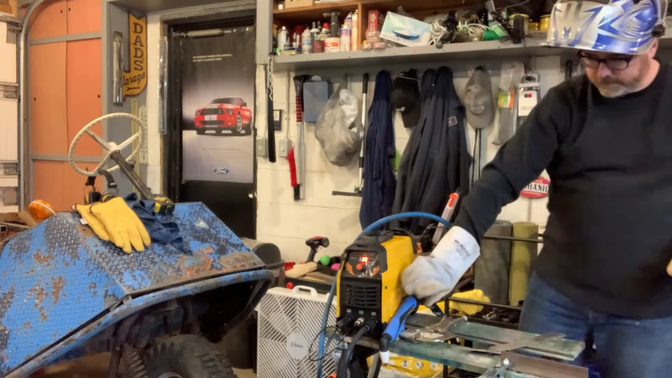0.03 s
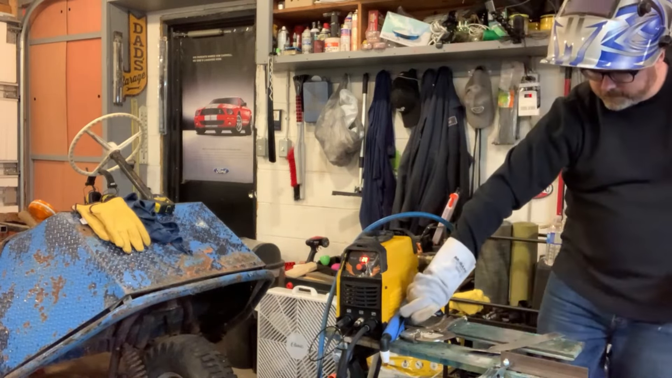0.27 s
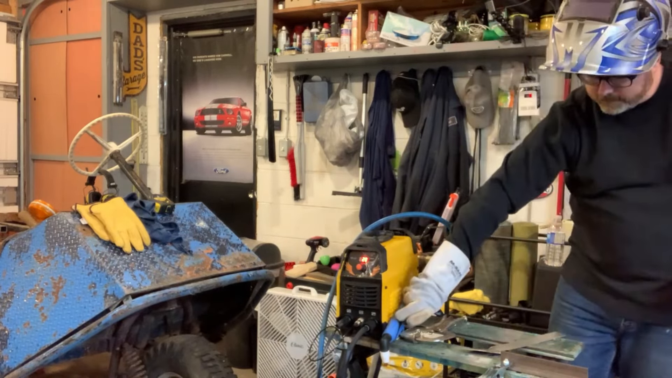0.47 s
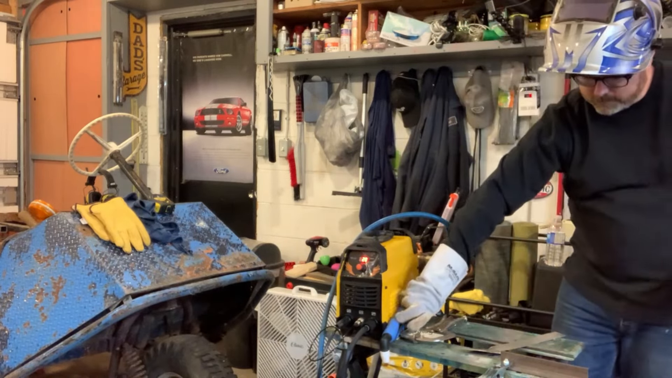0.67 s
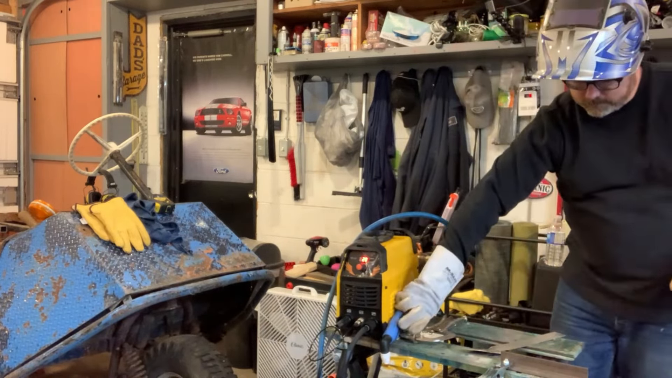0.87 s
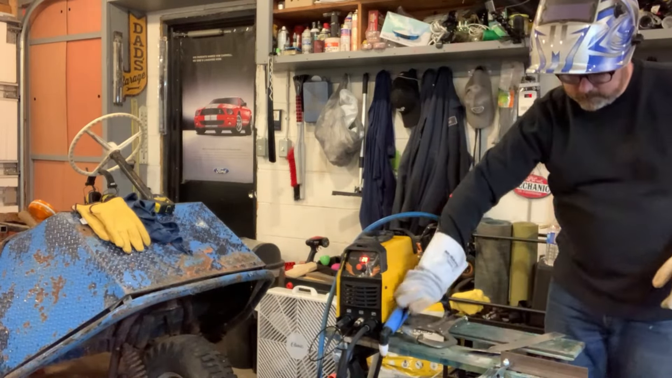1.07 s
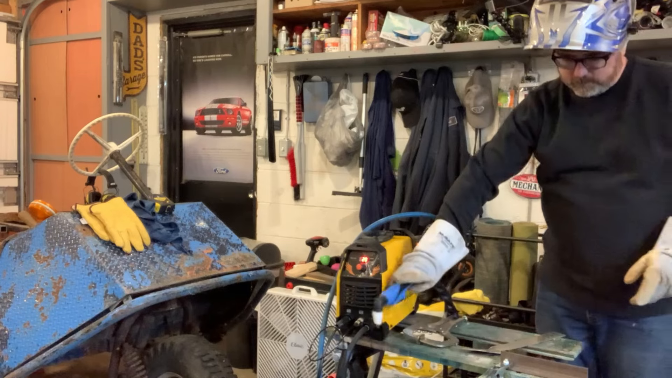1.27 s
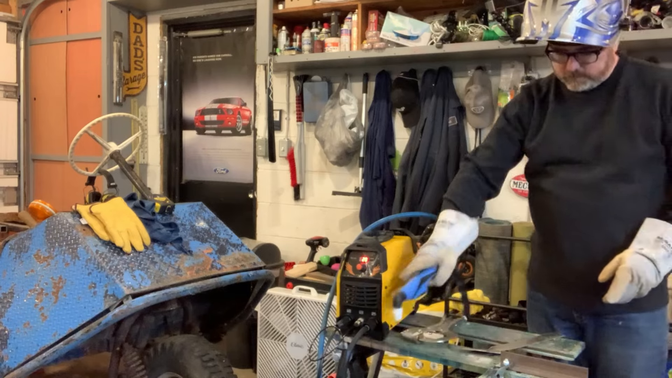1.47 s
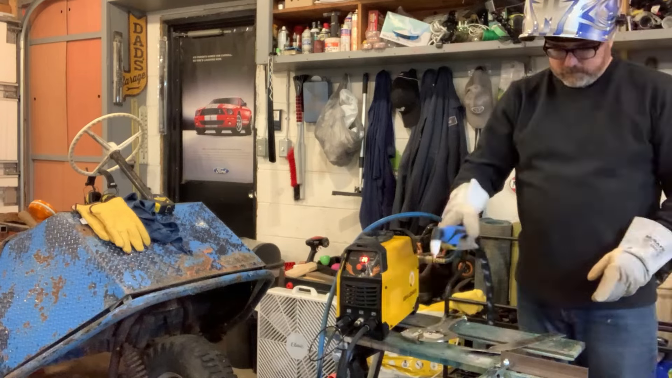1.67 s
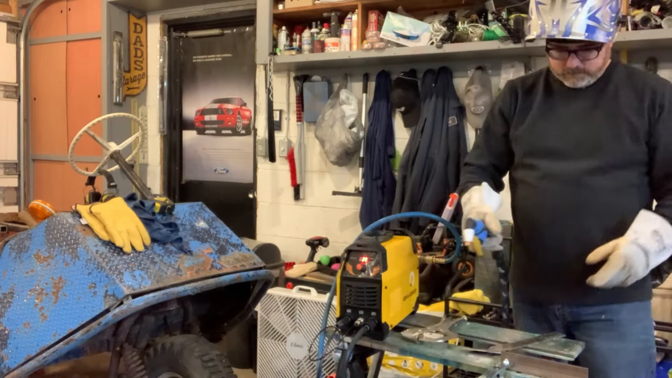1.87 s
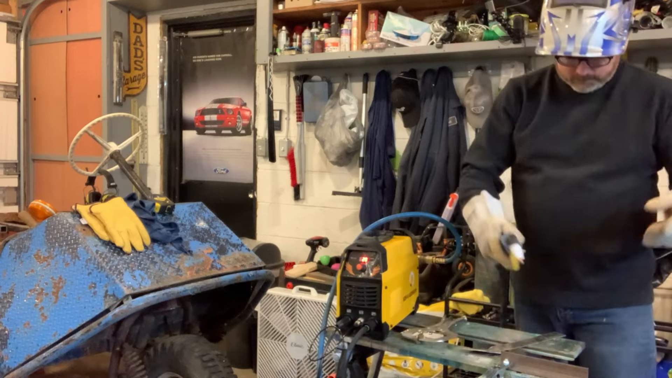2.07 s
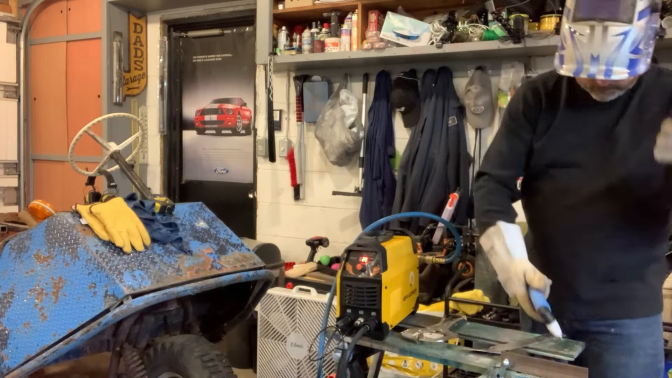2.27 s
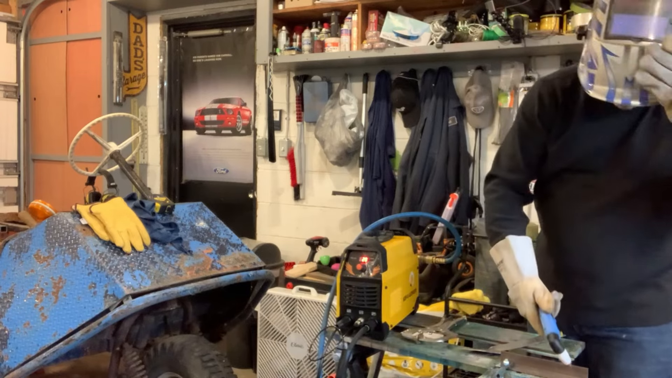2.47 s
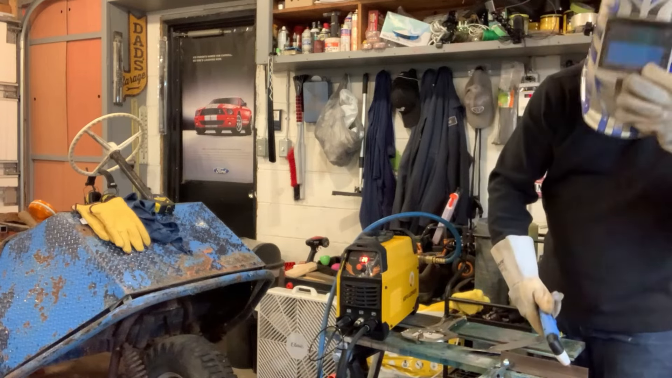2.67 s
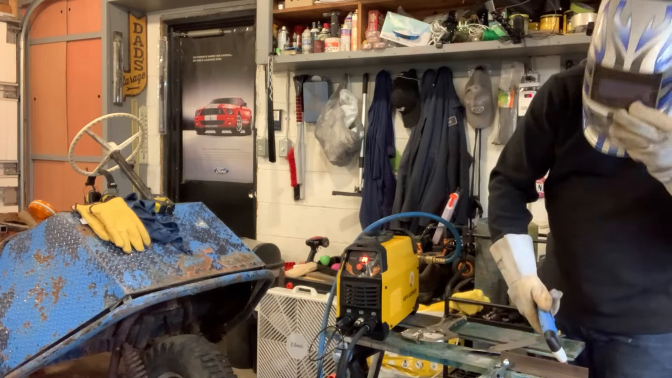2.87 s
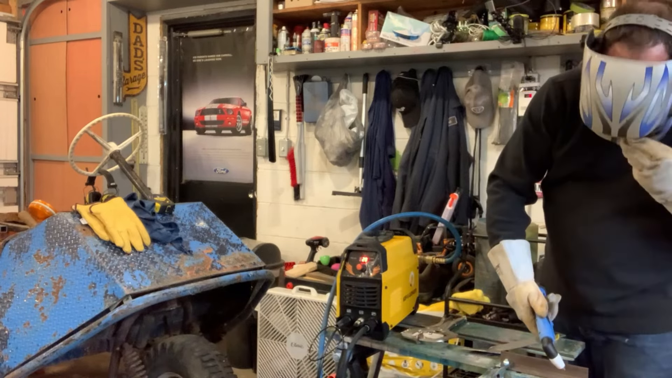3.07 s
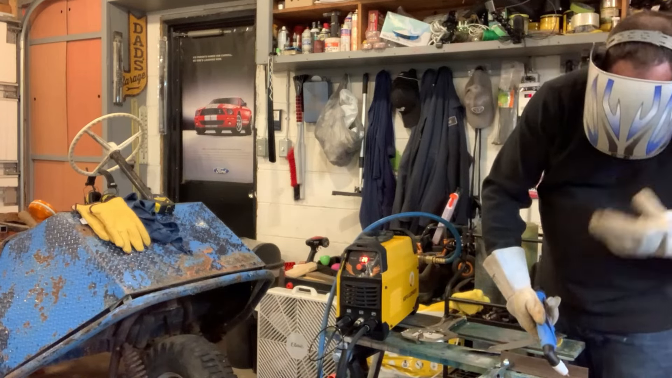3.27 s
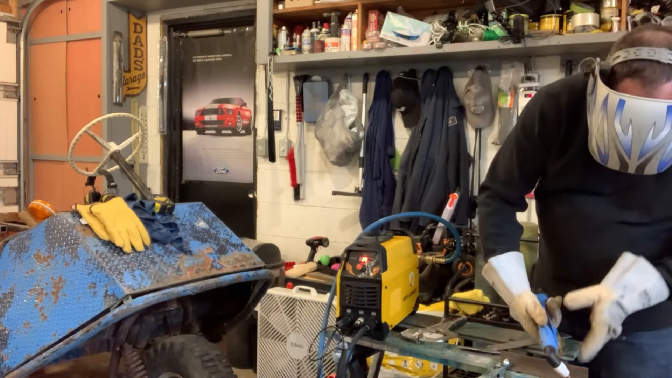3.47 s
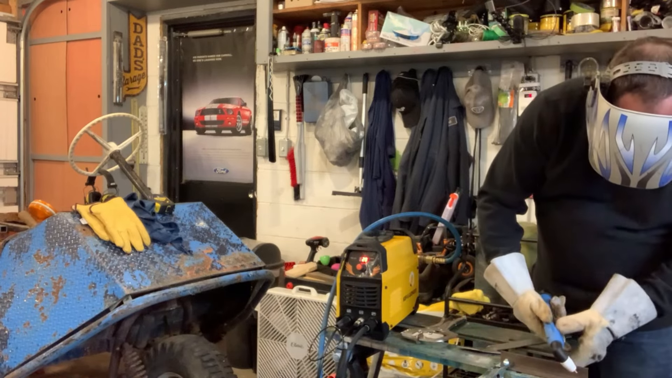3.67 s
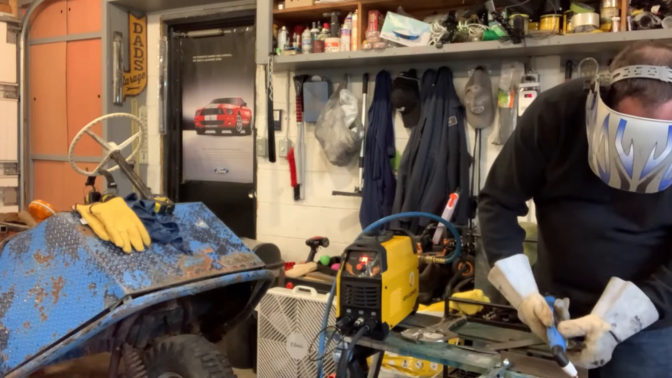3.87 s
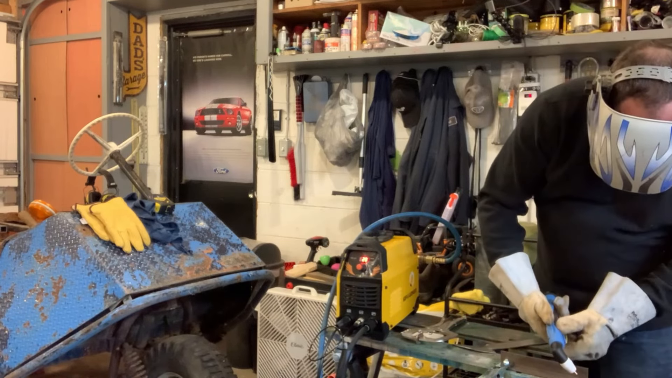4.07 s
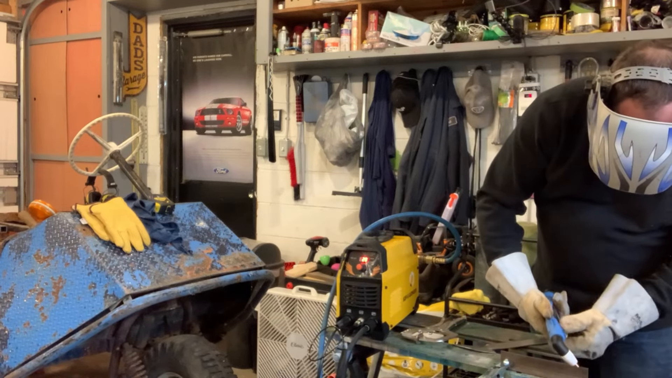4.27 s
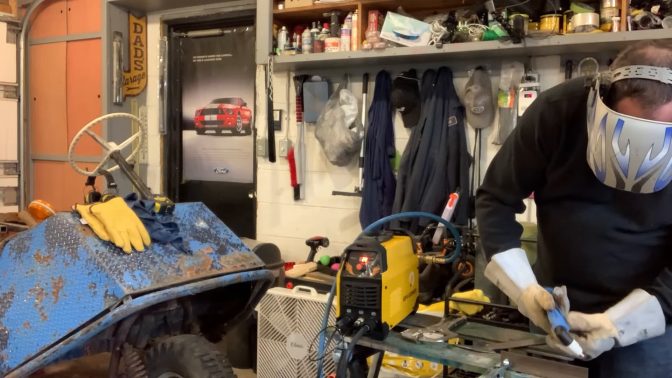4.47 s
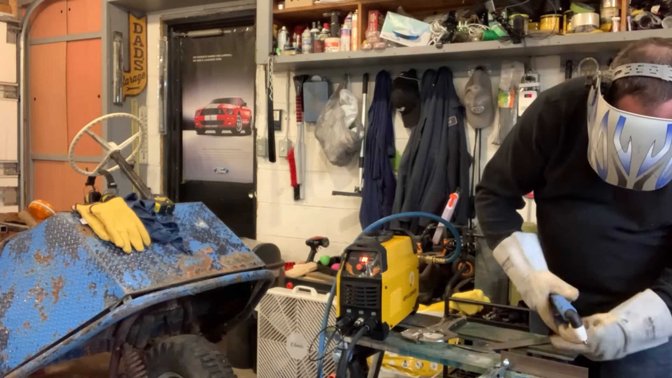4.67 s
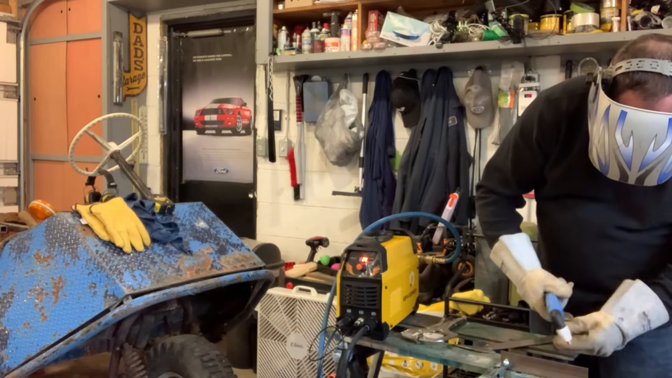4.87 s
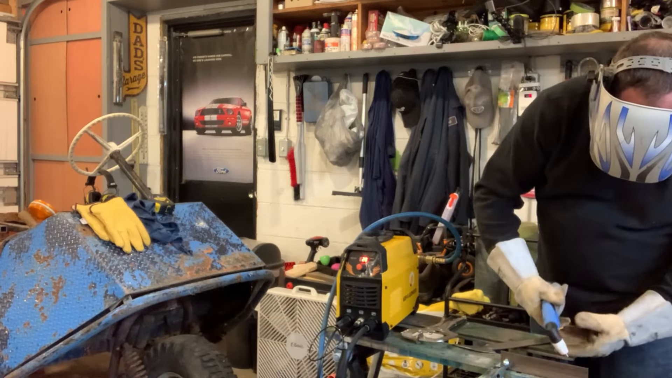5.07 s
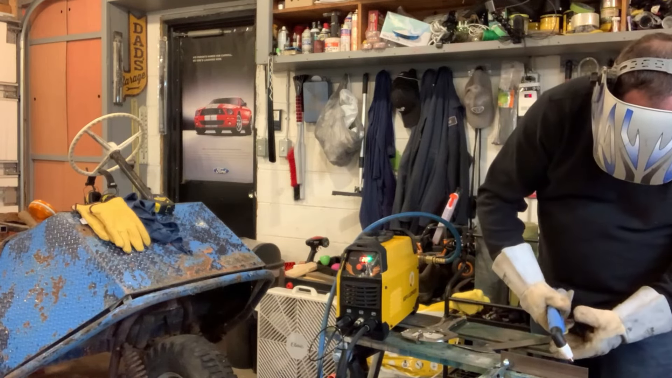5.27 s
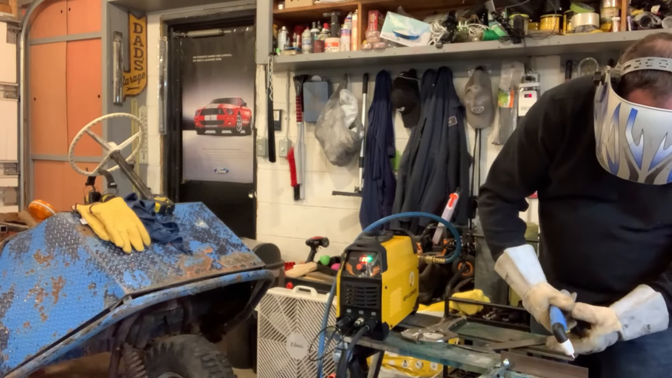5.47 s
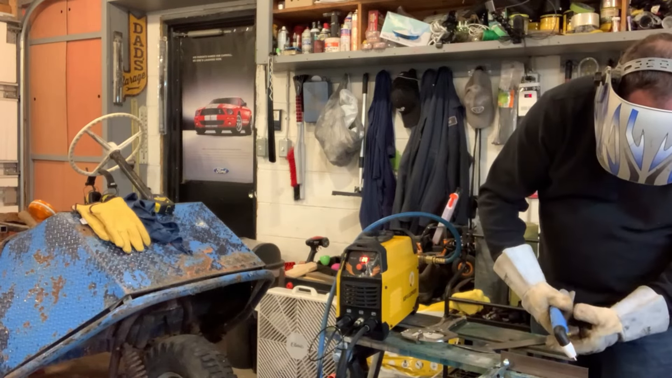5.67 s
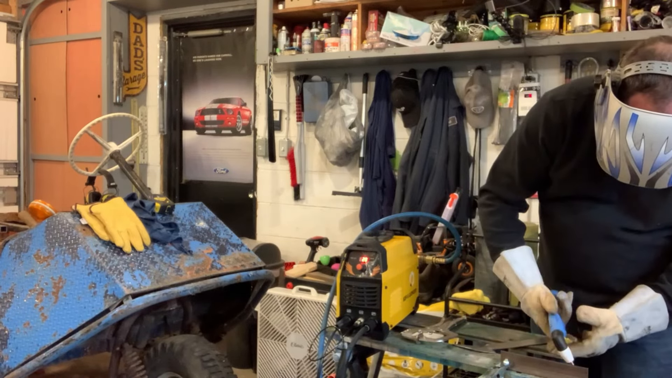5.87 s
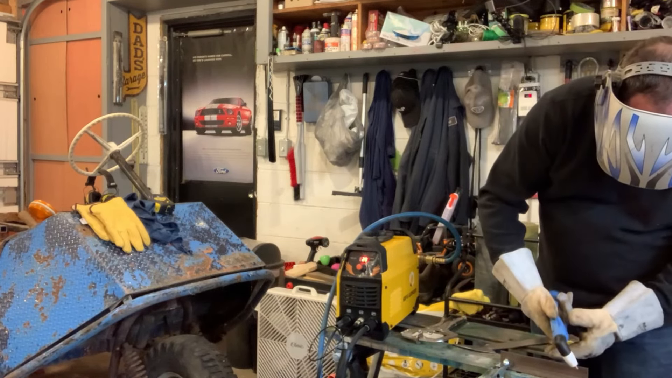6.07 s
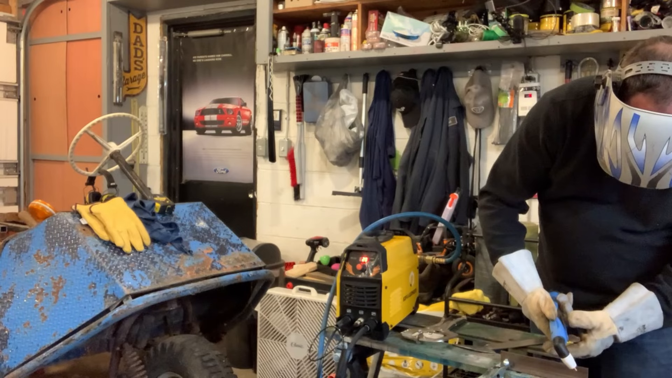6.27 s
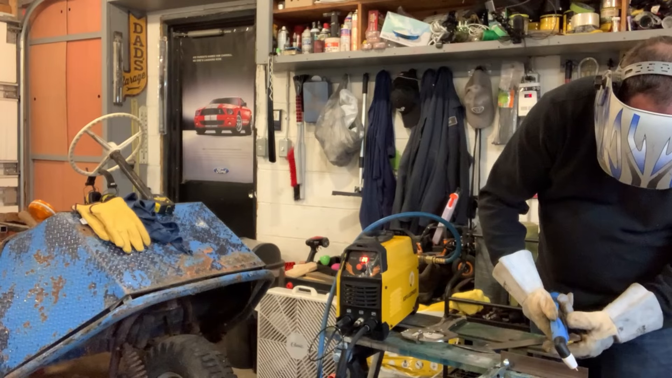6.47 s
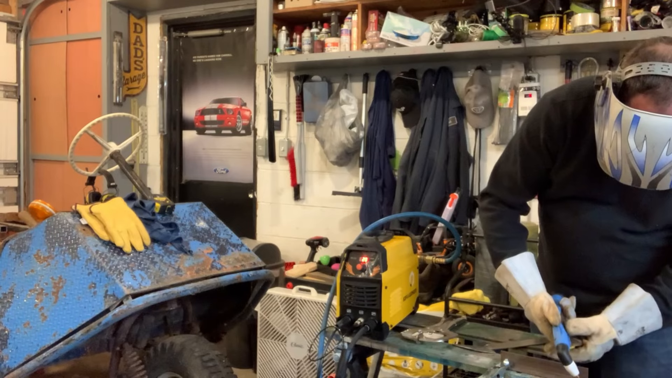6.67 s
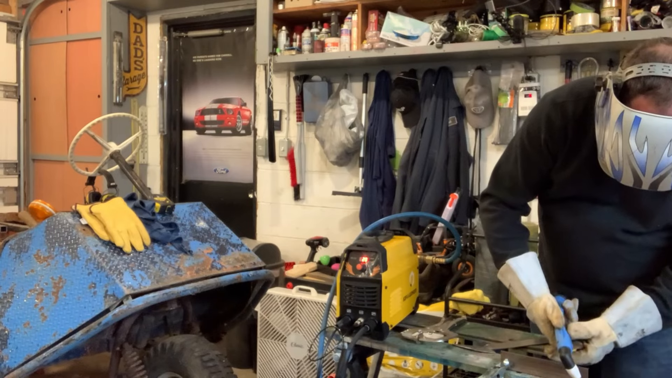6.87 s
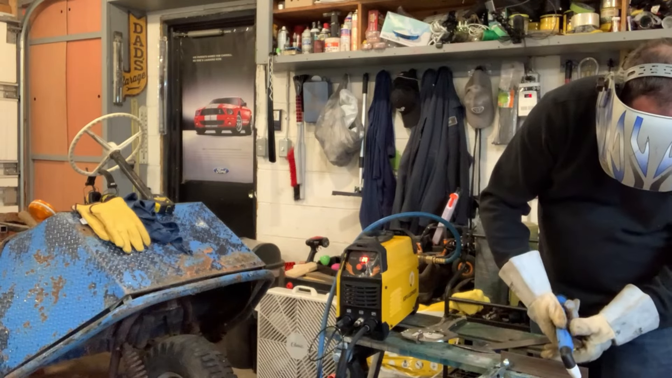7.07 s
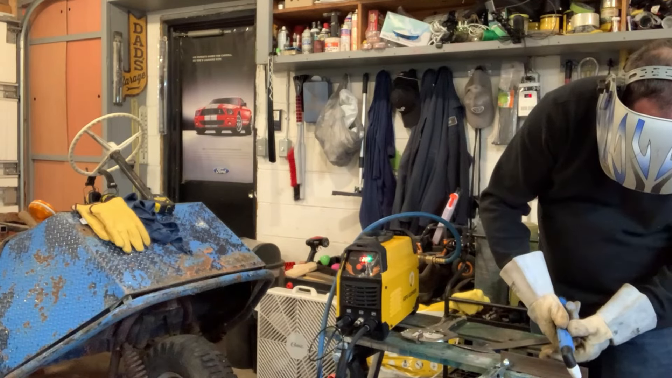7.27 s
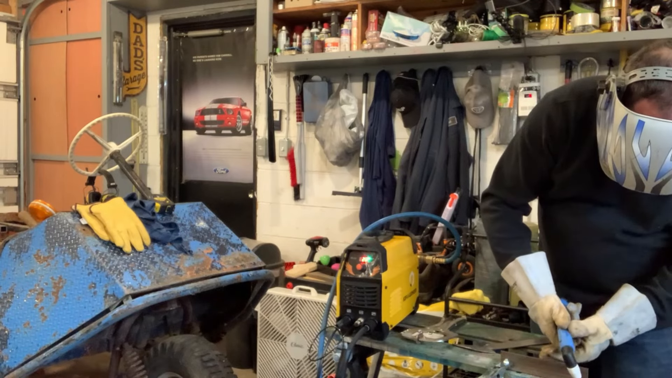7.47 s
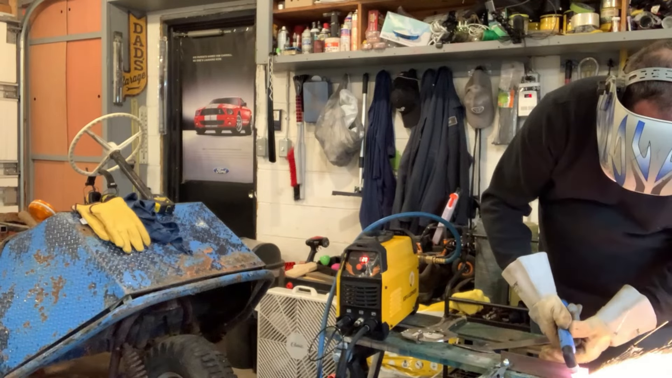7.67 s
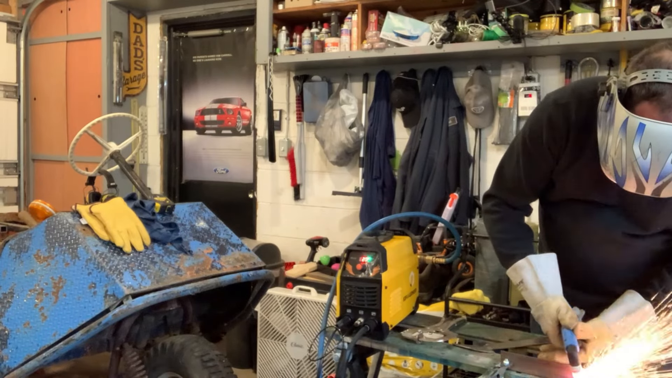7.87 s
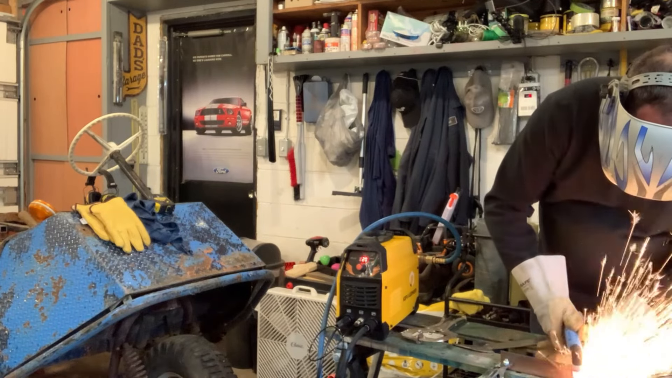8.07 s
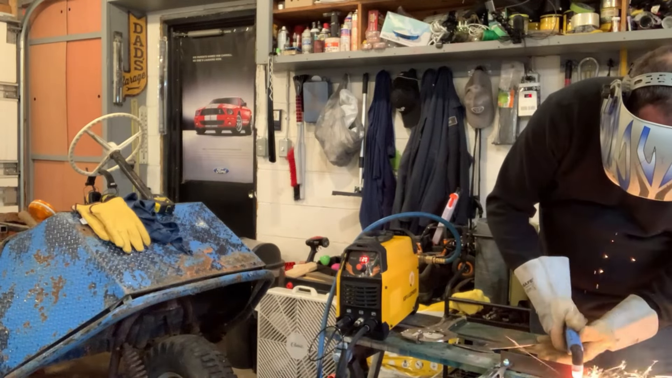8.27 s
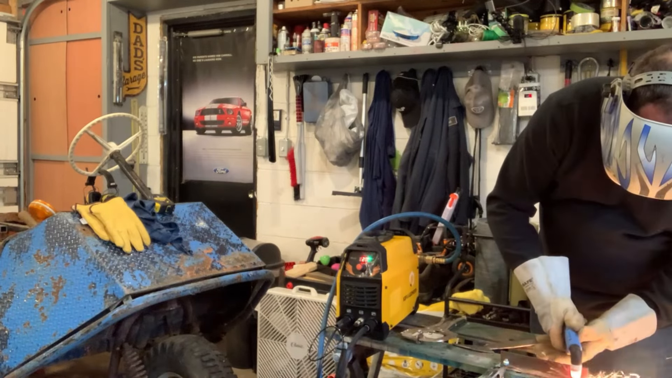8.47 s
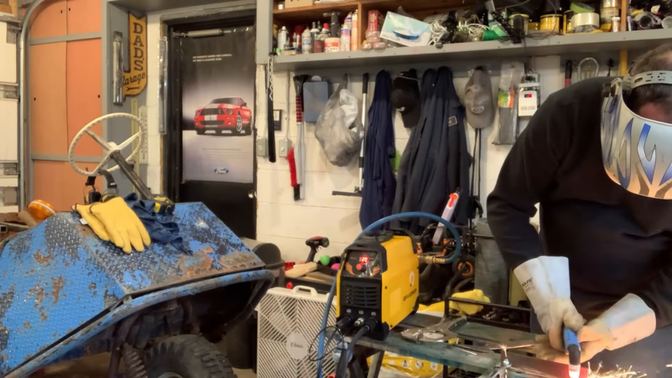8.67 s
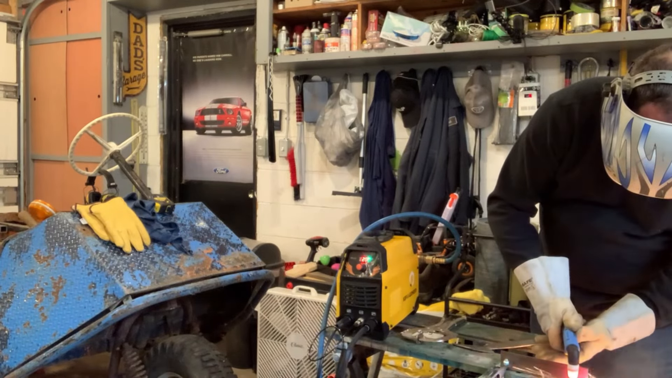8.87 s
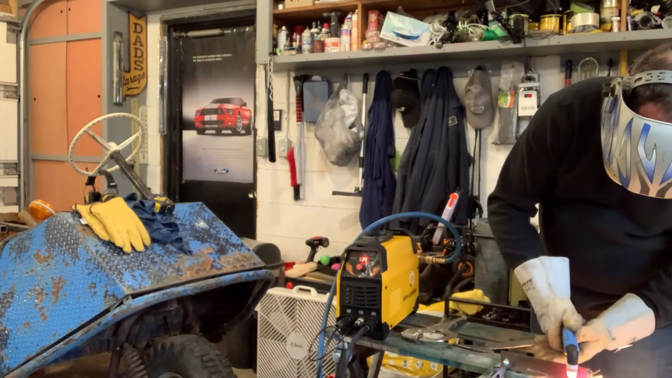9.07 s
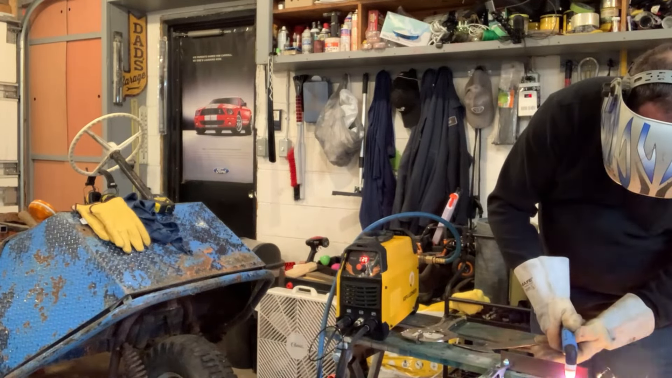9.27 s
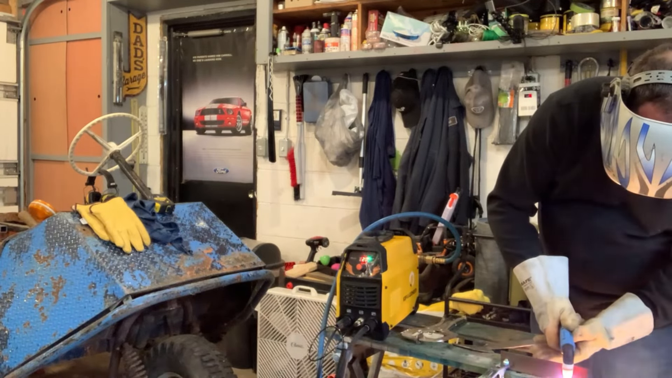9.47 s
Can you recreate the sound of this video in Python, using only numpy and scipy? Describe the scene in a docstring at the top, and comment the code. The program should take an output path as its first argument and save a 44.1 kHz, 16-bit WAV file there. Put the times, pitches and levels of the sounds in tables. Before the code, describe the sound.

A phone a few steps away picks up faint room hiss, hose bumps, glove and shoe scuffs, and two hard snaps as a cutting torch is readied. Small ticks lead to a clack and a bright, steady rush of air. It dips, clicks, then bursts into loud plasma cutting with fine spark crackle, briefly fiercest until the steel is pierced, then uneven to the end. Lively small-garage reflections.

```python
"""Bumps, knocks and two sharp snaps open the scene: a hand plasma torch is picked up in a cluttered garage.
Contacts are decaying noise or damped modes; shoes, cloth and hose are shaped noise.
The air valve clacks, then turbulent noise hisses and roars over the plate's edge, and the air sags.
The arc strikes and cuts steel: the jet noise surges, the melt sputters and sparks crackle as tiny clicks.
Dense echoes surround each source; a phone with two microphone ports hears it from a few steps away."""
import sys
import numpy as np
from scipy import signal
from scipy.fft import rfft, irfft, next_fast_len
from scipy.io import wavfile

SR = 44100
rng = np.random.default_rng(int(sys.argv[2]) if len(sys.argv) > 2 else 0)


def file_out(sig):
    """Save sig as 16-bit WAV at sys.argv[1]."""
    # one column per channel
    cols = np.atleast_2d(sig).T
    # limit, then scale
    lim = np.clip(cols, -1, 1)
    pcm = np.round(lim * 32767).astype(np.int16)
    wavfile.write(sys.argv[1], SR, pcm)


N = 419832

# All table levels are relative: sources and the room apply further gain.
# hiss of the jet in free air [t/s, level/dB]
AIR_LEVEL = [(5.58, -19.5), (6.1, -20), (6.72, -22.5), (6.9, -21), (7.26, -20.5)]
# jet over the plate's edge as the torch is lined up [t/s, low rumble/dB, mid roar/dB, high rush/dB]
EDGE_LEVEL = [(5.45, -43, -44, -43), (5.62, -44.5, -41.5, -42), (5.72, -41, -30.5, -41),
              (5.8, -42, -27.5, -43), (6.06, -40, -24.5, -27.5), (6.25, -43, -29.5, -30),
              (6.58, -45.5, -30, -32), (6.66, -56, -41.5, -50), (6.76, -59, -42, -42),
              (6.79, -55.5, -44, -33), (7.05, -67, -46, -32.5), (7.26, -62, -44.5, -43)]
# jet in the steel, swelling and sinking as the hand advances [t/s, level/dB]
CUT_LEVEL = [(8.13, -28.5), (8.2, -23.5), (8.236, -28), (8.338, -23.5), (8.41, -31), (8.424, -26),
             (8.864, -25), (8.992, -24.5), (9.016, -23.5), (9.198, -23.5), (9.224, -23.5), (9.486, -22),
             (9.49, -19)]
# spectral density of the free jet [f/Hz, level/dB per Hz]
JET_SPECTRUM = [(60, -54), (250, -34.5), (700, -26.5), (1400, -17.5), (2400, -12), (4200, -6.5), (5600, -8),
                (7000, -6), (8200, -0.5), (10000, 4), (12300, 4.5), (14000, 1.5), (15500, -5.5)]
# spectral densities of the flow over the edge [f/Hz, level/dB per Hz]
EDGE_RUMBLE_SPECTRUM = [(30, -22), (80, -15.5), (170, -5), (350, -0.5), (700, -0.5), (1200, 6), (2200, -20),
                        (5000, -45)]
EDGE_ROAR_SPECTRUM = [(300, -31), (800, -13), (1400, -2.5), (2200, 2.5), (3200, 1), (4800, -3.5),
                      (7000, -7.5), (12000, -20)]
EDGE_RUSH_SPECTRUM = [(1500, -32), (2500, -35), (3800, -3), (5000, -4), (7000, 3.5), (9000, -4),
                      (12000, -20)]
# spectral densities of the melt and of its late flare [f/Hz, level/dB per Hz]
MELT_SPECTRUM = [(30, -49), (80, -10), (170, -11.5), (350, -6), (700, -8.5), (1400, -3), (2200, 1.5),
                 (2900, -10), (4200, -14), (7000, 3.5), (12000, -4)]
FLARE_SPECTRUM = [(40, -20), (120, -16), (330, -3.5), (700, -1), (1200, 5.5), (2200, -5), (5000, -20),
                  (12000, -35)]
# steady narrow resonances that colour the torch's noise in the garage [f/Hz, width/Hz, level/dB]
TORCH_RESONANCES = [(322, 22, 3.5), (409, 18, 3.5), (549, 28, 4), (689, 38, 5.5), (872, 35, 3.5),
                    (1022, 45, 3.5), (1259, 30, 3), (1380, 32, 6), (1523, 22, 5), (1692, 22, 4.5),
                    (1780, 45, 3), (2585, 28, 4.5), (2780, 25, 4.5), (3060, 50, 4), (3140, 18, 4.5),
                    (3283, 18, 4), (3348, 30, 4.5), (3452, 22, 4), (3735, 35, 4), (3904, 18, 4.5),
                    (3972, 20, 4.5), (4360, 22, 4), (4530, 22, 3), (4575, 20, 3.5), (4648, 18, 4.5),
                    (4965, 28, 4), (11780, 38, 3.5), (12648, 70, 3), (13017, 22, 5.5), (14048, 38, 3),
                    (14345, 70, 3)]
# sharp snaps and trigger clicks, the last as the arc strikes [t/s, level/dB, t60/s]
SNAPS = [(1.1387, -1, .016), (3.4757, -3.5, .018), (5.101, -35, .012), (5.257, -29, .012),
         (7.556, -7.5, .09)]
# spectrum of a snap [f/Hz, level/dB]
SNAP_SPECTRUM = [(150, -62), (450, -1), (900, -13.5), (1800, -23.5), (3300, 1), (5500, -13), (7500, 12.5),
                 (10000, 16.5), (12000, 10.5), (14000, 14), (15500, -45.5)]
# knocks of torch, lead and switchgear [t/s, thud/dB, body/dB, crack/dB, body t60/s]
KNOCKS = [(0.399, -44, -48, -66, 0.032), (0.82, -55, -58, -66, .03), (0.912, -51, -53, -62, 0.034),
          (1.04, -37, -20.5, -32.5, 0.1), (1.138, -53, -28.5, -25, 0.13), (1.438, -50.5, -41, -64, 0.24),
          (1.637, -60, -46.5, -62, 0.33), (1.679, -51.5, -33.5, -64, 0.058), (2.099, -53, -52, -57, 0.077),
          (3.474, -66, -32, -23, 0.13), (4.932, -55, -40.5, -56, 0.042), (5.328, -45, -43, -20, 0.046),
          (7.267, -50, -35.5, -67, 0.082), (7.46, -50, -37.5, -24, 0.058),
          (7.553, -37.5, -32, -18.5, 0.029)]
# spectra of the three parts of a knock [f/Hz, level/dB]
THUD_SPECTRUM = [(30, -35), (100, -9), (200, -3), (380, 0), (700, -12), (2000, -40)]
BODY_SPECTRUM = [(50, -49), (200, -38.5), (450, -2), (900, 6), (1750, -1), (2600, -10), (6000, -29)]
CRACK_SPECTRUM = [(100, -42), (250, -42), (450, -7.5), (1000, -1.5), (2000, 1), (3200, 4), (6000, 0.5),
                  (11000, 4), (15000, -9)]
# trigger pressed home and the air valve's answer [t/s, level/dB, t60/s]
TRIGGER_CLICKS = [(5.257, -25.5, .016), (5.26, -29, .016), (5.329, -16.5, 0.032)]
# spectrum of those clicks [f/Hz, level/dB]
TRIGGER_SPECTRUM = [(500, -29), (1000, -14.5), (1500, -2.5), (2100, -2), (3100, 3), (4300, -6.5),
                    (5500, -22), (12000, -15)]
# torch tip ticking on the steel [t/s, level/dB, t60/s]
TIP_TICKS = [(4.933, -38, 0.01), (5.101, -30.5, 0.013)]
# spectrum of a tick [f/Hz, level/dB]
TICK_SPECTRUM = [(800, -25), (3000, -10), (4300, 0), (6500, -2), (8000, -2), (15000, -18)]
# hollow bumps of hose, bench and feet, and the arc's thump [t/s, level/dB, f/Hz, t60/s, width/Hz]
BUMPS = [(.243, -39.5, 324, 0.096, 25), (.28, -42.5, 300, 0.08, 27), (.403, -42.5, 157, 0.081, 36),
         (0.515, -52, 315, 0.076, 15), (.818, -41, 310, 0.082, 22), (.912, -37.5, 235, 0.077, 15),
         (.94, -40, 326, .06, 15), (2.104, -50, 93, 0.093, 18), (2.905, -51, 97, 0.092, 15),
         (3.362, -49, 210, 0.15, 20), (7.555, -25, 95, 0.029, 10)]
# a ring of the torch cable and light taps of tip, scrap and trigger [t/s, level/dB, f/Hz, t60/s, width/Hz]
TAPS = [(1.69, -47, 758, 0.53, 22), (4.639, -44.5, 1305, 0.033, 110), (4.934, -29.5, 1200, 0.014, 500),
        (5.102, -39, 1970, 0.017, 600), (5.258, -47, 1530, 0.079, 80)]
# valve and relay clacks in the cutter [t/s, level/dB]
CLACKS = [(5.329, -33.5), (7.268, -49), (7.462, -46)]
# modes of the cutter's case [f/Hz, level/dB, t60/s]
CASE_MODES = [(292, -27, 0.07), (332, -2.5, 0.22), (362.2, 6, 0.19), (416, -13, 0.096), (650, -6, 0.077),
              (720, -10, 0.12), (1167, -5, 0.13), (1510, -10, 0.13), (1914, 1, 0.089), (2270, -1, 0.077),
              (3180, -22, 0.12), (4160, -5, 0.11)]
# strokes of shoes and gloves [t/s, level/dB, t60/s, resonance f/Hz]
STROKES = [(1.68, -40, 0.35, 760), (2.596, -42, 0.19, 457), (2.657, -41, 0.12, 475),
           (2.725, -46.5, 0.14, 444), (2.83, -38, 0.13, 433), (2.894, -37, 0.14, 467),
           (2.96, -40, 0.13, 437), (3.024, -44.5, 0.14, 430)]
# spectrum of rubbing [f/Hz, level/dB per Hz]
RUB_SPECTRUM = [(70, -5), (200, -1.5), (450, 4.5), (730, 5), (1100, -10.5), (2300, -5.5), (4000, -12),
                (9000, -66)]
# movements that rustle sleeves and hose [middle t/s, length/s, level/dB]
MOVES = [(.03, .09, -67), (0.225, 0.1, -63.5), (.48, .07, -70), (.71, 0.09, -70), (.96, 0.16, -63.5),
         (1.3, 0.3, -58.5), (1.838, 0.093, -57), (2.117, 0.21, -61), (2.4, 0.086, -67.5), (2.69, 0.24, -60),
         (3.01, 0.091, -59), (3.36, 0.27, -63.5), (3.79, 0.12, -63.5), (3.93, 0.064, -65.5),
         (4.245, 0.081, -65.5), (4.39, 0.034, -76), (4.6, 0.25, -65), (4.83, 0.086, -74),
         (5.12, 0.33, -64.5)]
# spectrum of the rustling cloth [f/Hz, level/dB per Hz]
CLOTH_SPECTRUM = [(60, -48), (250, -3.5), (700, -3.5), (1400, -1), (2500, -6.5), (5000, -8), (12000, -55)]
# hose dragged over the bench [middle t/s, length/s, level/dB]
DRAGS = [(3.38, 0.06, -52), (3.755, 0.051, -56.5), (3.85, 0.044, -59), (3.945, 0.062, -53)]
# spectrum of the drag [f/Hz, level/dB per Hz]
DRAG_SPECTRUM = [(60, -17), (150, -5), (250, 5), (420, -5.5), (700, -13), (2000, -27)]
# hollow resonances of the drag [f/Hz, width/Hz, level/dB]
DRAG_RESONANCES = [(222, 19, 11), (364, 42, 11)]
# background rumble and hiss [f/Hz, level/dB per Hz]
FLOOR_SPECTRUM = [(25, -15), (58, 4.5), (110, -6.5), (300, -14), (600, -20.5), (1200, -15.5), (2500, -10.5),
                  (5500, -8.5), (8000, 1), (10000, -3.5), (12500, 0), (14000, -2.5), (15500, -12)]
# decay time of the garage [f/Hz, t60/s]
GARAGE_T60 = [(100, 0.26), (400, 0.35), (1500, 0.26), (5000, 0.37), (10000, 0.27), (15000, 0.12)]
# echo against direct sound, before each source's own offset [f/Hz, level/dB]
GARAGE_WET = [(100, 3.5), (1000, 3.4), (5000, 6.04), (10000, 6.64), (15000, 0.37)]
# left-right correlation of echo and background [f/Hz, correlation]
GARAGE_LIKENESS = [(50, 0.54), (250, 0.73), (600, 0), (1200, 0), (15000, 0.019)]
# part of the phone's treble common to both sides [f/Hz, share 0-1]
TREBLE_SHARED = [(5000, 0), (6500, .5), (7400, .92), (7800, 1)]
# phase by which the right side leads in that treble [f/Hz, phase/rad]
TREBLE_PHASE = [(5000, 4.7), (6500, 4.1), (7500, 3.6), (7900, 3.15), (9600, 3.13), (10100, 2.8),
                (11000, 1.85), (12000, 1.0), (13200, 0)]

VALVE_OPEN_S, ARC_STRIKE_S = 5.329, 7.555
# before the cut the hose fills, the jet holds, then bleeds away until the trigger is pressed again
HOSE_FILL_S, FIRST_PUFF_DB = 0.11, -31
BLEED_START_S, BLEED_DB_PER_S = 7.28, 85
RETRIGGER_S, REFILL_DB_PER_S = 7.462, 104
# the jet blasts back off the plate until it has pierced it, hardest in a burst as the arc strikes
CUT_DB, PIERCE_DB, PIERCED_S, PIERCE_RELEASE_S = 0.63, 10, 8.04, 0.016
BURST_DB, BURST_S = 5, 0.046
# the melt: level at the jet's mean, and share of the jet's swing in dB
MELT_DB, MELT_FOLLOWS = -36, 0.38
FLARE_S, FLARE_DB, FLARE_DB_PER_S = 9.18, -45, 11
# unsteadiness of cut, edge flow and melt; level of the sparks
SURGE_DB, EDGE_WAVER_DB, SPUTTER_DB, SPARKS_DB = .8, .7, 3.2, -36
REBOUND_S, REBOUND_DB = .011, -7
SCUFF_ATTACK_S, SCUFF_RING_WIDTH_HZ, SCUFF_RING_DB = 0.0083, 88, 10
GRIT_DB = -23  # against the rubbing of a stroke
PORT_LAG_S, CUTOFF_HZ = .00018, 15800

T = np.arange(N) / SR
HZ = np.maximum(np.arange(N // 2 + 1) * SR / N, 1)


def torch():
    """Turbulence: one unsteady flow drives jet and edge noise; the melt sputters on its own."""
    cutting, cut_db = T >= ARC_STRIKE_S, cut_level()
    flutter = drift(90)  # the air leaves the nozzle unevenly
    sputter = cutting * from_db(SPUTTER_DB * drift(110))
    layers = air_jet(flutter, cutting, cut_db) + edge_flow(flutter) + molten_steel(sputter, cutting, cut_db)
    resonance_db = peaks_db(TORCH_RESONANCES)
    # the jet is a long source: its two ends excite the room each in their own way
    ends = sum(level * noise(spectrum, resonance_db, channels=2) for level, spectrum in layers)
    surge = from_db(SURGE_DB * cutting * drift(22))  # the cut advances in small fits and starts
    nozzle, plume = ends * surge
    sparks = sputter * from_db(SPARKS_DB) * crackles(per_s=600, size_db=5.0, top_hz=12000)
    return garage(nozzle, wet_db=0.6, pan_db=1.5) + garage(plume + sparks, wet_db=-0.1, pan_db=2.0)


def air_jet(flutter, cutting, cut_db):
    """Jet noise: broadband turbulence follows the free air flow, then the level of the cut."""
    air_db, = in_time(AIR_LEVEL)
    free = air_flow() * from_db(air_db + 1.1 * flutter)
    return [(free + cutting * from_db(cut_db + flutter), JET_SPECTRUM)]


def edge_flow(flutter):
    """Edge noise: flow over a sharp edge makes rumble, roar and rush, each with its own level."""
    flow = air_flow() * from_db(1.8 * flutter + EDGE_WAVER_DB * drift(25))
    spectra = [EDGE_RUMBLE_SPECTRUM, EDGE_ROAR_SPECTRUM, EDGE_RUSH_SPECTRUM]
    return [(flow * from_db(db), spectrum) for db, spectrum in zip(in_time(EDGE_LEVEL), spectra)]


def molten_steel(sputter, cutting, cut_db):
    """Forced agitation: the sputtering melt follows part of the jet's swing and flares up late in the cut."""
    swing_db = cut_db - cut_db[cutting].mean()
    melt = sputter * from_db(MELT_DB + MELT_FOLLOWS * swing_db)
    flare = sputter * (T >= FLARE_S) * from_db(FLARE_DB + FLARE_DB_PER_S * since(FLARE_S))
    return [(melt, MELT_SPECTRUM), (flare, FLARE_SPECTRUM)]


def air_flow():
    """Filling and discharge: flow before the cut approaches its full share, bleeds away and builds again."""
    growth = 1 - (1 - from_db(FIRST_PUFF_DB)) * np.exp(-since(VALVE_OPEN_S) / HOSE_FILL_S)
    filling = (T >= VALVE_OPEN_S) * growth
    bled_db = BLEED_DB_PER_S * (since(BLEED_START_S) - since(RETRIGGER_S))
    refill_db = REFILL_DB_PER_S * since(RETRIGGER_S)
    return filling * from_db(np.minimum(refill_db - bled_db, 0)) * (T < ARC_STRIKE_S)


def cut_level():
    """Exponential relaxation: burst and piercing excess (dB) decay onto the uneven advance of the cut."""
    advance_db, = in_time(CUT_LEVEL)
    piercing_db = PIERCE_DB * np.exp(-since(PIERCED_S) / PIERCE_RELEASE_S)
    burst_db = BURST_DB * np.exp(-since(ARC_STRIKE_S) / BURST_S)
    return CUT_DB + advance_db + piercing_db + burst_db


def knocks():
    """Impact: a low thud, a woody body and a shorter crack decay together; ticks and clicks sound drier."""
    s, thud_db, body_db, crack_db, t60 = np.transpose(KNOCKS)
    thud = from_db(6.0) * burst(s, thud_db, 1.7 * t60, THUD_SPECTRUM)
    body = from_db(-0.5) * burst(s, body_db, t60, BODY_SPECTRUM)
    crack = from_db(8.0) * burst(s, crack_db, 0.43 * t60, CRACK_SPECTRUM)
    trigger = burst(*np.transpose(TRIGGER_CLICKS), TRIGGER_SPECTRUM)
    ticks = burst(*np.transpose(TIP_TICKS), TICK_SPECTRUM)
    close = garage(trigger + ticks, wet_db=-5, pan_db=1.5)
    return garage(thud + body + crack, wet_db=5.0, pan_db=2.0) + close


def snaps():
    """Hard contact: a very brief, bright impact gives decaying high-frequency noise."""
    return garage(burst(*np.transpose(SNAPS), SNAP_SPECTRUM), wet_db=-2.5, pan_db=0)


def ringing_bodies():
    """Resonance: bumps and taps ring single modes, and the cutter's case rings many."""
    case = cutter_case()
    bumps = from_db(8.5) * pings(BUMPS, attack_s=.016)
    taps = from_db(5.5) * pings(TAPS, attack_s=.0004)
    return garage(bumps + taps + case, wet_db=4.0, pan_db=2.5)


def cutter_case():
    """Modal excitation: valve and relay strike the case and rebound once."""
    rebounds = [(s + REBOUND_S, level_db + REBOUND_DB) for s, level_db in CLACKS]
    return struck(CLACKS + rebounds, CASE_MODES, spread_db=1.5)


def scuffs():
    """Friction: cloth, dragged hose and gritty strokes share one place in the room."""
    return garage(cloth_rustle() + hose_drag() + floor_strokes(), wet_db=0.5, pan_db=2.0)


def cloth_rustle():
    """Distributed friction: coloured noise swells with each movement and flickers irregularly."""
    return swells(MOVES) * from_db(0.5 + 0.89 * drift(30)) * noise(CLOTH_SPECTRUM)


def hose_drag():
    """Resonant friction: swelling noise is lifted at the hollow resonances."""
    return swells(DRAGS) * noise(DRAG_SPECTRUM, peaks_db(DRAG_RESONANCES))


def floor_strokes():
    """Stick-slip: irregularly modulated rubbing sings faintly in one resonance amid grit."""
    slips = rms_one(from_db(4 * drift(170)))
    grit = from_db(GRIT_DB) * crackles(per_s=770, size_db=9.0, top_hz=4000)
    out = np.zeros(N)
    for s, level_db, t60, hz in STROKES:
        attack = 1 - np.exp(-since(s) / SCUFF_ATTACK_S)
        stroke = attack * decays([s], [level_db + 2.5], [t60])
        ring_db = peaks_db([(hz, SCUFF_RING_WIDTH_HZ, SCUFF_RING_DB)])
        out += stroke * (slips * noise(RUB_SPECTRUM, ring_db) + grit)
    return out


def background():
    """Partial correlation: faint steady rumble, more alike on both sides than the thin hiss above it."""
    left, other = noise(FLOOR_SPECTRUM), noise(FLOOR_SPECTRUM)
    alike = np.clip(at_hz(GARAGE_LIKENESS, HZ), -1, 1)
    right = irfft(alike * rfft(left) + np.sqrt(1 - alike ** 2) * rfft(other), N)
    return from_db(-52.0) * np.array([left, right])


def garage(x, wet_db, pan_db):
    """Reverberation: direct sound reaches the right port first, then dense echoes die band by band."""
    size = SR // 2
    age, hz = T[:size], np.maximum(np.arange(size // 2 + 1) * SR / size, 1)
    centres = np.geomspace(60, 15000, 9)
    white = rfft(rng.standard_normal((2, size)))
    tail = np.zeros((2, size))
    build_up = 1 - np.exp(-age / 0.0012)
    for centre, pick in zip(centres, np.eye(len(centres))):
        # overlapping bands, triangular in log frequency
        mid, side = irfft(white * np.interp(np.log(hz), np.log(centres), pick), size)
        alike = np.clip(at_hz(GARAGE_LIKENESS, centre), -1, 1)
        fade = build_up * np.exp(-np.log(1000) * age / at_hz(GARAGE_T60, centre))
        pair = np.sqrt((1 + alike) / 2) * mid + np.sqrt((1 - alike) / 2) * side * [[1], [-1]]
        echo_gain = from_db(at_hz(GARAGE_WET, centre) + wet_db)
        tail += pair * fade / np.linalg.norm(fade) * echo_gain
    late_left = np.pad(x, (round(PORT_LAG_S * SR), 0))[:N]
    direct = np.array([late_left, x])
    both = direct + signal.fftconvolve(x[None], tail, axes=1)[:, :N]
    return both * from_db([[-pan_db / 2], [pan_db / 2]]) / np.sqrt(1 + from_db(wet_db) ** 2)


def burst(times, levels_db, t60s, spectrum):
    """Minimum phase: decaying contact noise is coloured causally, so that nothing sounds early."""
    size = 4096
    gain = from_db(at_hz(spectrum, np.maximum(np.arange(size // 2 + 1) * SR / size, 1)))
    # folding the cepstrum forward makes the filter causal
    cepstrum = irfft(np.log(gain))[:size // 2]
    response = irfft(np.exp(rfft(np.r_[cepstrum[0], 2 * cepstrum[1:]], size)))
    contact = decays(times, levels_db, t60s) * rng.standard_normal(N)
    return signal.oaconvolve(contact, response / np.linalg.norm(response))[:N]


def struck(blows, modes, spread_db):
    """Modal superposition: every blow rings every damped mode, each with a chance strength."""
    times, levels_db = np.transpose(blows)
    chance, out = rng.standard_normal((len(blows), len(modes))), np.zeros(N)
    for k, (hz, mode_db, t60) in enumerate(modes):
        clicks = np.full(N, 1e-18)  # tiny floor keeps the filter out of denormal numbers
        clicks[np.round(times * SR).astype(int)] = from_db(levels_db + mode_db + spread_db * chance[:, k])
        r, w = np.exp(-np.log(1000) / (t60 * SR)), 2 * np.pi * hz / SR
        out += signal.lfilter([0, np.sin(w)], [1, -2 * r * np.cos(w), r * r], clicks)
    return out


def pings(rows, attack_s):
    """Phase diffusion: a random phase smears each damped resonance over its width; soft contacts swell slowly."""
    out, age = np.zeros(N), T[:SR // 3]
    for s, level_db, hz, t60, width in rows:
        start = round(s * SR)
        swell = (1 - np.exp(-age / attack_s)) * np.exp(-np.log(1000) * age / t60)
        wander = np.cumsum(rng.standard_normal(len(age))) * np.sqrt(2 * np.pi * abs(width) / SR)
        ring = swell * np.sin(2 * np.pi * hz * age + wander)
        skirts = signal.butter(1, [hz / 2, hz * 2], "band", fs=SR, output="sos")
        out[start:start + len(age)] += from_db(level_db) * signal.sosfilt(skirts, ring)
    return out


def crackles(per_s, size_db, top_hz):
    """Random impulses: tiny clicks of uneven size, as grit under a shoe or bursting drops of steel."""
    born = rng.random(N) < per_s / SR
    sizes = from_db(size_db * np.minimum(rng.exponential(1, N), 4)) * rng.choice([-1, 1], N)
    band = signal.butter(1, [1500, top_hz], "band", fs=SR, output="sos")
    return rms_one(signal.sosfilt(band, born * sizes))


def noise(spectrum, lift_db=0, channels=1):
    """Spectral shaping: white noise gains a broad spectrum and a lift, then unit rms."""
    low_cut_db = -10 * np.log10(1 + (20 / HZ) ** 4)
    level_db = at_hz(spectrum, HZ) + low_cut_db + lift_db
    white = rng.standard_normal((channels, 2 * len(HZ))).view(complex)
    return rms_one(irfft(white * from_db(level_db), N)).squeeze()


def peaks_db(resonances):
    """Resonance curve: each narrow peak lifts the level (dB) around its centre."""
    return sum(peak_db / (1 + (2 * (HZ - hz) / width) ** 2) for hz, width, peak_db in resonances)


def decays(times, levels_db, t60s):
    """Exponential decay: blows start at once, die away within a second and add in power."""
    power = np.zeros(N)
    for s, level_db, t60 in zip(times, levels_db, t60s):
        start = round(s * SR)
        age = T[:min(SR, N - start)]
        power[start:start + len(age)] += from_db(level_db - 60 * age / t60) ** 2
    return np.sqrt(power)


def swells(rows):
    """Gaussian envelope: movements swell and fade symmetrically."""
    return sum(from_db(level_db) * np.exp(-2 * ((T - s) / length) ** 2) for s, length, level_db in rows)


def drift(rate):
    """Random fluctuation: straight lines join normal chance values, rate of them per second."""
    knots = rng.standard_normal(4000)
    return np.interp(T * rate, np.arange(len(knots)), knots)


def since(s):
    """Elapsed time: seconds gone by after a moment, zero before it."""
    return np.maximum(T - s, 0)


def in_time(rows):
    """Linear interpolation: each column of a curve at every sample."""
    s, *columns = np.transpose(rows)
    return [np.interp(T, s, c) for c in columns]


def at_hz(points, hz):
    """Logarithmic interpolation: read a table on a log-frequency axis."""
    table_hz, values = np.transpose(points)
    return np.interp(np.log(hz), np.log(table_hz), values)


def from_db(db):
    """Level law: decibels to amplitude gain."""
    return 10 ** (np.asarray(db) / 20)


def rms_one(x):
    """Normalisation: scale to unit rms."""
    return x / np.sqrt(np.mean(x ** 2) + 1e-20)


def scene():
    """Superposition: the sounds of handling, the torch and the background add linearly."""
    return knocks() + snaps() + ringing_bodies() + scuffs() + torch() + background()


def record(dry):
    """Transduction: the phone shares phase-turned treble, clips peaks and cuts both ends of the range."""
    size = next_fast_len(N + SR, True)
    left, right = rfft(dry, size)
    hz = np.maximum(np.arange(len(left)) * SR / size, 1)
    shared = at_hz(TREBLE_SHARED, hz)
    turned_left = left * np.exp(1j * at_hz(TREBLE_PHASE, hz))
    right = np.sqrt(1 - shared ** 2) * right + shared * turned_left
    clipped = np.clip(irfft(np.array([left, right]), size)[:, :N], -1, 1)
    no_rumble = signal.sosfilt(signal.butter(3, 40, "high", fs=SR, output="sos"), clipped)
    return signal.sosfilt(signal.ellip(10, .1, 80, CUTOFF_HZ, fs=SR, output="sos"), no_rumble)


dry = scene()
out = record(dry)
file_out(out)
```